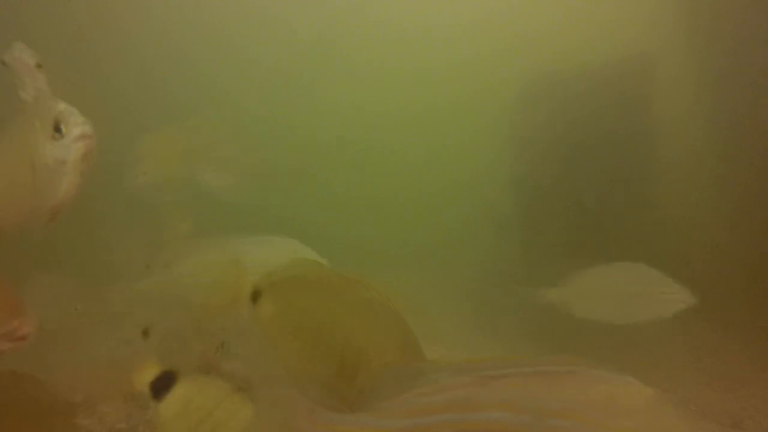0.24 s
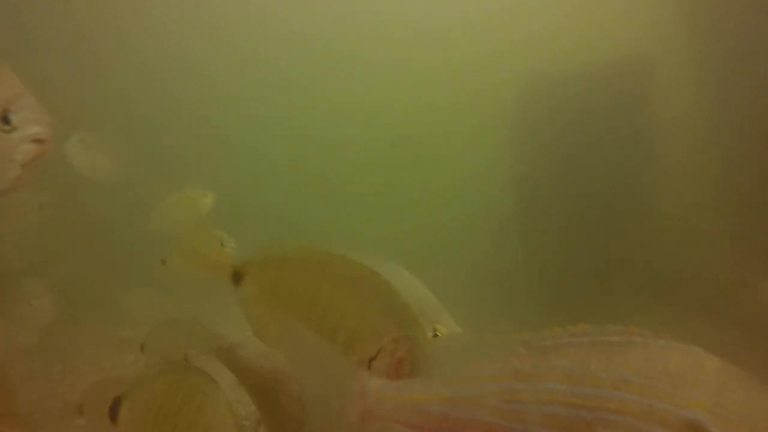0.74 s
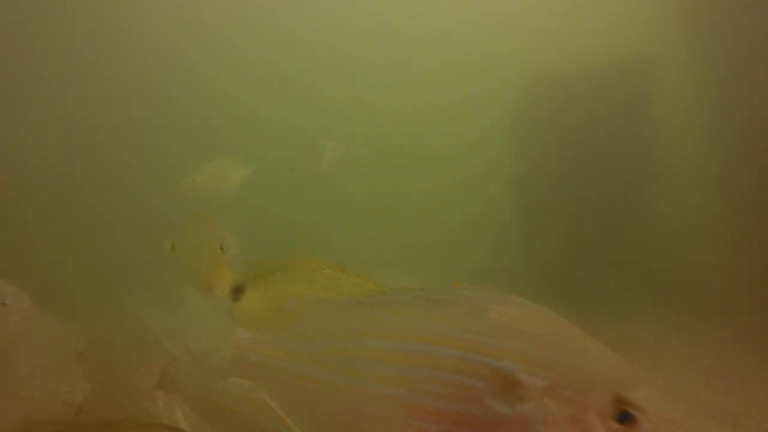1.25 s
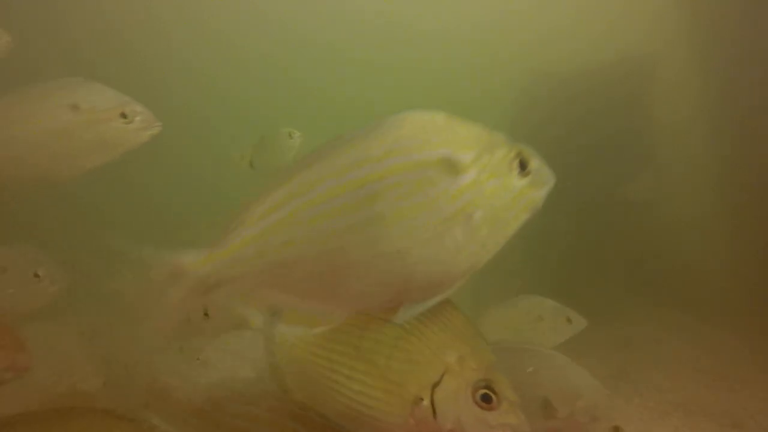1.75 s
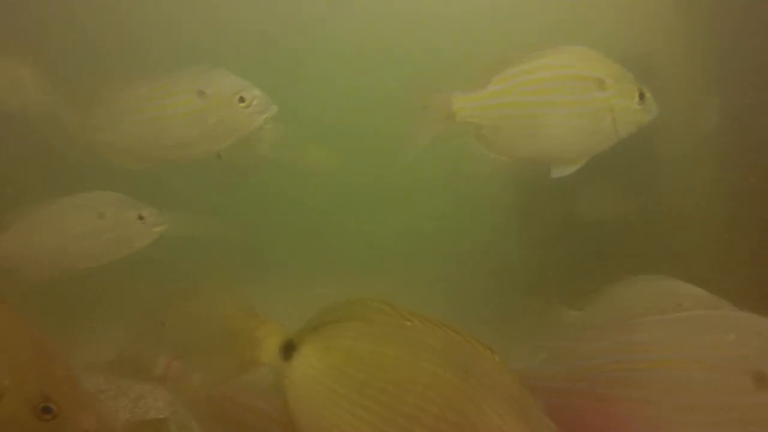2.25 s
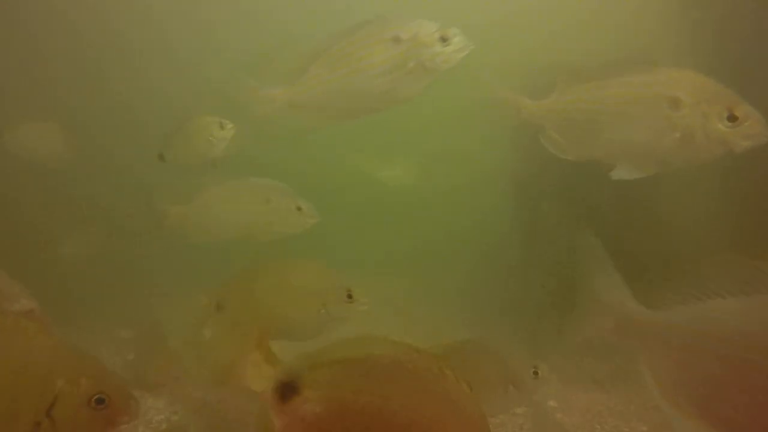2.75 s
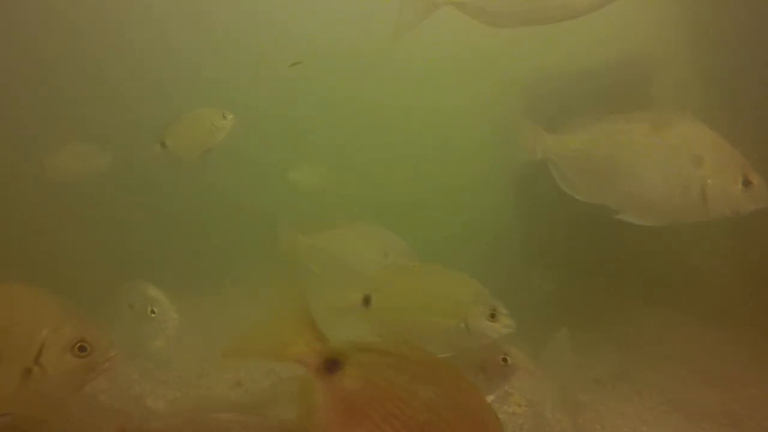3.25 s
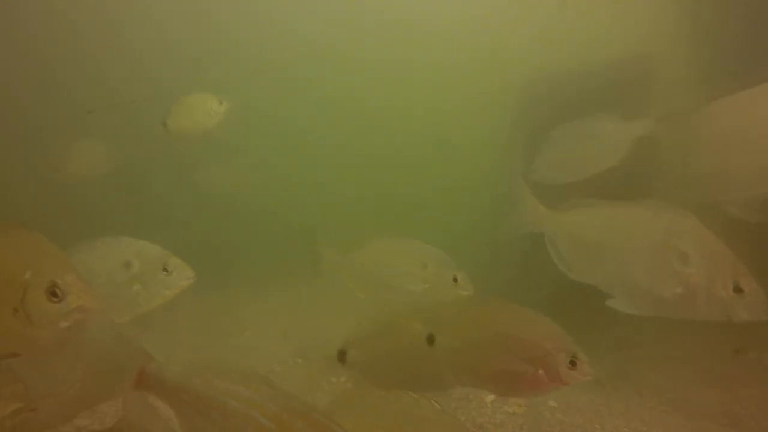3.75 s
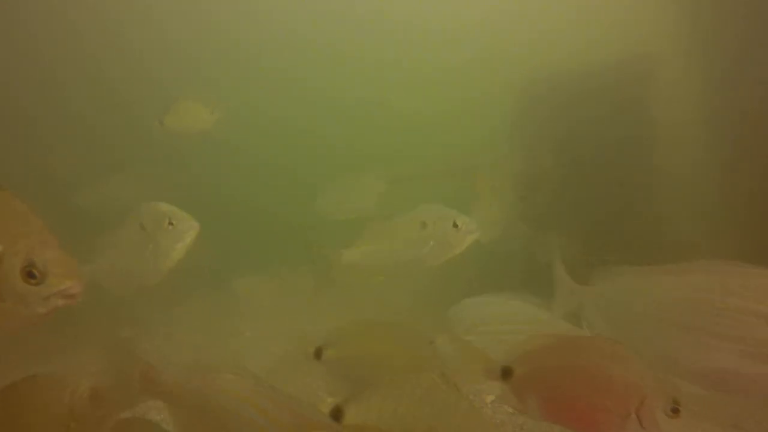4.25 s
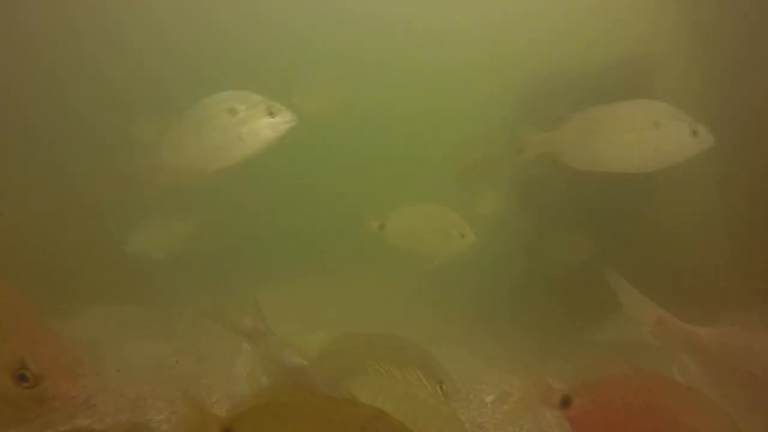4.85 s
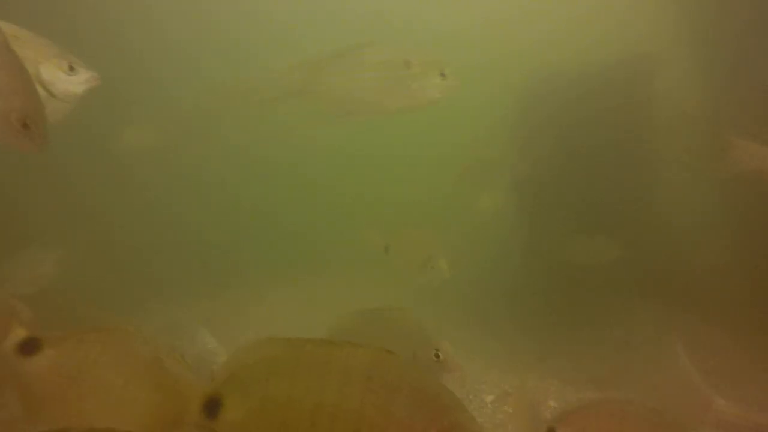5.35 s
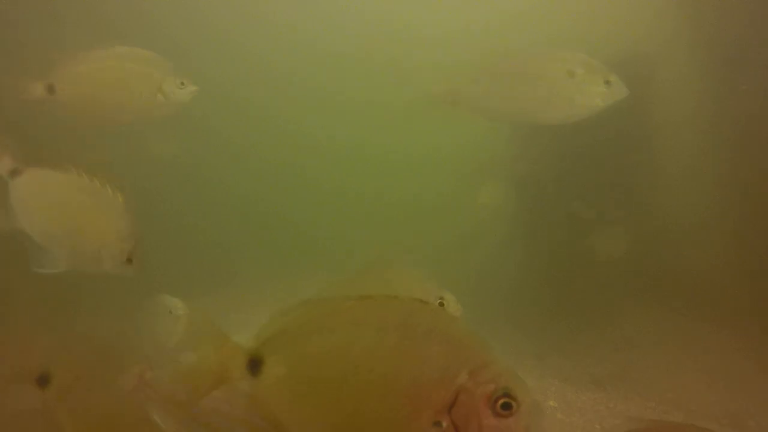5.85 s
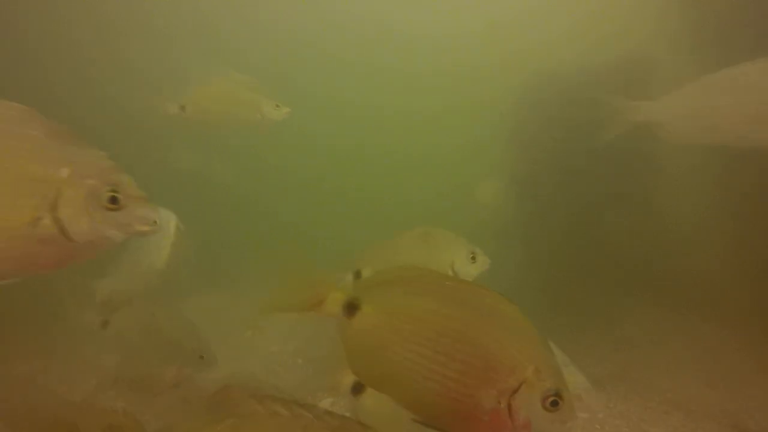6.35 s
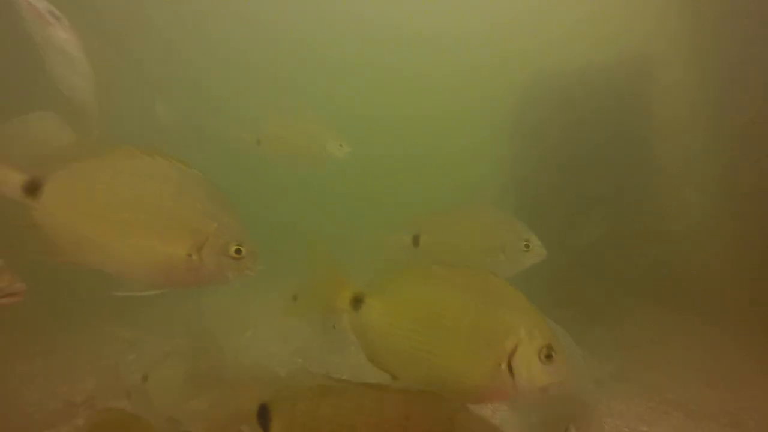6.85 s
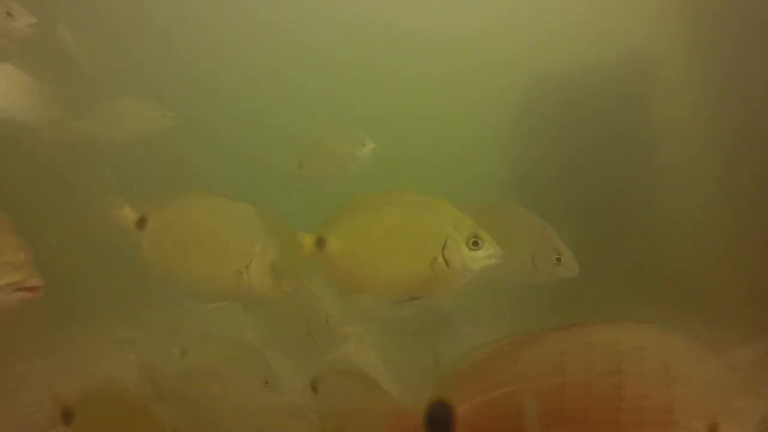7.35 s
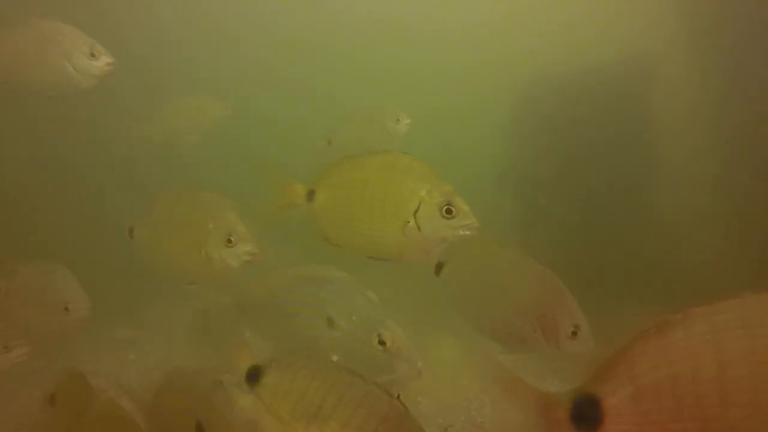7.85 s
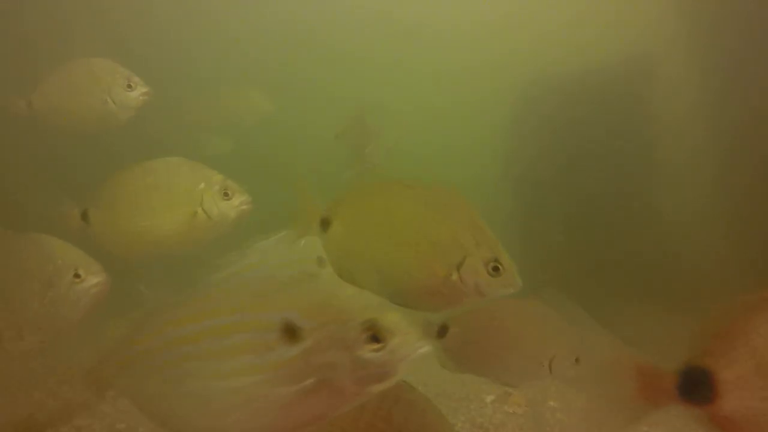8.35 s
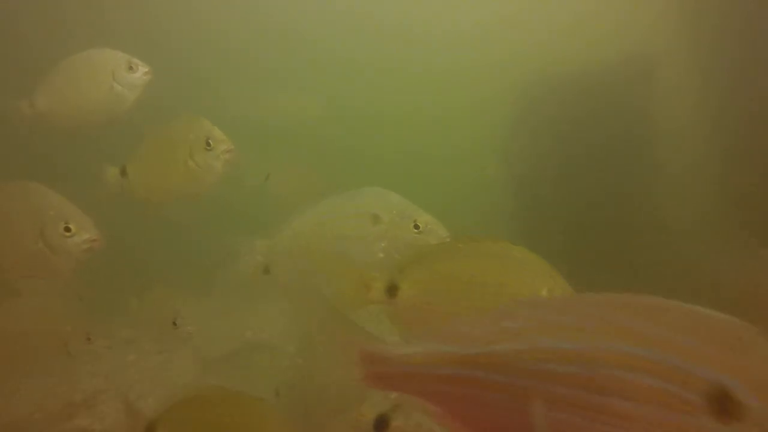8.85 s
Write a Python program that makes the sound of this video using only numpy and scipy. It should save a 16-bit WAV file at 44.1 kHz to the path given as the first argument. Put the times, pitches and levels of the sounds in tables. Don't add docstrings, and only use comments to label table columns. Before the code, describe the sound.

Underwater crackle of snapping shrimp, dense faint ticking with sharp louder clicks, over a low rumble of water, humming groans and small bubble gurgles.

```python
import sys
import numpy as np
from scipy import signal
from scipy.fft import rfft, irfft
from scipy.io import wavfile

SR = 44100
rng = np.random.default_rng(int(sys.argv[2]) if len(sys.argv) > 2 else 0)


def boost(x):
    u = np.asarray(x, float) / 20
    return 10 ** u


def to_wav(s):
    ch = np.atleast_2d(s).T
    pcm = np.round(np.clip(ch, -1, 1) * 32767)
    wavfile.write(sys.argv[1], SR, pcm.astype(np.int16))


N = 401310

# (frequency [Hz], width [Hz], level [dB])
SHELL_MODES = [(790, 560, -34.5), (1602, 71, -8), (1990, 212, -5), (2367, 225, -0.5), (2701, 123, -0.5),
               (2927, 234, -5), (3592, 230, -3.5), (4276, 570, -15), (5185, 236, -7), (5790, 2100, -16.5),
               (7610, 790, -14), (8690, 980, -21.5), (10740, 820, -21), (12650, 860, -24.5),
               (15100, 1600, -40)]
# (time [s], knock level [dB], ring over knock [dB], crack over knock [dB])
NEAR_SNAPS = [(.2604, -32.5, 2, -3), (.759, -40.5, -2, 5.5), (.9977, -29.5, -12, -17),
              (1.1928, -30.5, -3, -6.5), (2.295, -39, 1, 1), (3.3853, -22, -14.5, -7.5),
              (3.6418, -25.5, -5, 0.5), (3.8608, -20, -2, -2), (3.9214, -19.5, -24, -19.5),
              (4.411, -27, -11.5, -18), (5.1213, -39.5, 5.5, 3.5), (5.3551, -18, 0, -17),
              (5.4098, -37, -10, -3.5), (5.4978, -17, -5.5, -16.5), (5.6973, -42, 2.5, 8),
              (5.769, -27.5, -0.5, -4.5), (6.3621, -34, -9, 3.5), (6.4328, -27.5, -23, -29.5),
              (7.2845, -31, -22, -19), (7.59, -15.5, -3.5, -7), (7.668, -28.5, -12, -9.5),
              (8.033, -20.5, -28, -16.5), (8.106, -35.5, -3.5, -6.5), (8.19, -26, -12, -22),
              (8.307, -31.5, -10, -15), (8.3617, -24, -36, -25), (8.545, -28, -10.5, -14.5),
              (8.6709, -24, -31, -20), (8.9015, -20.5, -32, -20), (9.0517, -22.5, -15, -11.5)]


def rms_one(x):
    return x / np.sqrt(np.mean(x ** 2) + 1e-20)


def in_time(rows):
    s, *columns = np.transpose(rows)
    return [np.interp(np.arange(N) / SR, s, c) for c in columns]


def drift(rate_hz):
    r = np.exp(-80 * np.pi * rate_hz / SR)
    chance = rng.standard_normal(N // 40 + 2002)
    slow = signal.lfilter([1], [1, -2 * r, r * r], chance)[2000:]
    return np.interp(np.arange(N) / 40, np.arange(len(slow)), rms_one(slow))


def swells(start, hold, db, calm_db, rise_db_s, fall_db_s):
    t = np.arange(N) / SR
    level = np.full(N, float(calm_db))
    for s, h, top in zip(start, hold, db):
        before, after = np.maximum(s - t, 0), np.maximum(t - s - h, 0)
        level = np.maximum(level, top - rise_db_s * before - fall_db_s * after)
    return level


def butter(x, hz, kind, order=2):
    return signal.sosfilt(signal.butter(order, hz, kind, fs=SR, output="sos"), x)


def resonance(x, hz, width_hz):
    r = np.exp(-np.pi * width_hz / SR)
    poles = [1, -2 * r * np.cos(2 * np.pi * hz / SR), r * r]
    return signal.lfilter([(1 - r * r) / 2, 0, (r * r - 1) / 2], poles, x)


def tone(hz, db, wobble=.01, flutter_db=1.):
    phase = 2 * np.pi * np.cumsum(hz * (1 + wobble * drift(7.6))) / SR
    return np.sqrt(2) * boost(db + flutter_db * drift(9.1)) * np.sin(phase)


def pier_hum():
    # (start [s], hold [s], frequency [Hz], level [dB])
    hums = [(0, 0.27, 45.8, -50.5), (0.416, 0.39, 52.8, -47), (1.04, 0.33, 52.7, -31),
            (1.396, 0.3, 50.9, -32), (2.403, 0.29, 55, -54.5), (3.62, 0.46, 53.3, -39.5),
            (4.18, 0.042, 58, -39), (4.377, 0.26, 55, -41), (4.849, .2, 52.7, -46), (5.1, 0.13, 52.3, -43),
            (5.527, .04, 53.9, -52), (5.726, 0.027, 56.1, -46.5), (6.449, 0.27, 58.16, -46),
            (6.8, 0.23, 60.1, -39.5), (7.25, 0.071, 52.4, -45), (8.202, 0.13, 50.7, -50.5),
            (8.7, 0.094, 58, -44.5), (8.881, 0.23, 53.9, -39)]
    start, hold, hz, db = np.transpose(hums)
    pitch, = in_time(np.transpose([start + hold / 2, hz]))
    level_db = swells(start, hold, db, calm_db=-59, rise_db_s=116, fall_db_s=78)
    return tone(pitch, level_db, wobble=0.021, flutter_db=3.0)


def surge():
    # (start [s], hold [s], deep surge level [dB], slosh level [dB])
    waves = [(0, 0.14, -47, -61), (0.77, 0.34, -42, -43), (1.26, 0.39, -42.5, -43.5),
             (2.407, 0.27, -66, -55), (2.902, 0.27, -56.5, -63), (3.633, 0.034, -49, -55),
             (3.93, .6, -43.5, -43), (4.787, 0.025, -52, -46.5), (5.117, 0.022, -57.5, -42),
             (5.35, 0.26, -66, -55.5), (6.717, .35, -40, -43), (7.301, 0.76, -70, -54),
             (8.792, 0.17, -47, -44.5), (8.996, 0.087, -44, -46)]
    start, hold, deep_db, slosh_db = np.transpose(waves)
    deep_db = swells(start, hold, deep_db, calm_db=-64, rise_db_s=60, fall_db_s=70)
    slosh_db = swells(start, hold, slosh_db, calm_db=-58.5, rise_db_s=118, fall_db_s=103)
    deep, slosh = rng.standard_normal((2, N))
    deep = resonance(resonance(deep, 29.9, 5.0), 29.9, 5.0)
    slosh = butter(slosh, [62., 93.], "band", order=3)
    return boost(deep_db) * rms_one(deep) + boost(slosh_db + 2.5 * drift(12.0)) * rms_one(slosh)


def water_wash():
    # (frequency [Hz], level per Hz [dB])
    spectrum = [(12, -25), (20, -10), (69, -8), (124, -2.5), (422, -10.5), (627, -16), (743, -14.5),
                (1120, -19.5), (1410, -19), (1580, -18), (1800, -32), (2340, -50), (3960, -120)]
    curve_hz, curve_db = np.transpose(spectrum)
    hz = np.maximum(np.arange(N // 2 + 1) * SR / N, 1)
    gain = boost(np.interp(np.log(hz), np.log(curve_hz), curve_db))
    wash = irfft(rfft(rng.standard_normal(N)) * gain, N)
    return boost(-55.5) * rms_one(wash)


def gurgle():
    # (start [s], hold [s], level [dB])
    clouds = [
        (0, 1.9, -59),
        (4.005, 0.87, -55),
        (4.994, 0.17, -55.5),
        (5.7, 0.19, -60),
        (6.598, 0.28, -59.5),
        (7.598, 0.67, -55.5),
    ]
    bubbles_per_s = 500 * boost(5 * drift(7))
    born = rng.random(N) < bubbles_per_s / SR
    strength = boost(4 * np.minimum(rng.exponential(1, N), 3))
    kicks = born * strength * rng.choice([-1, 1], N)
    size = rng.integers(0, 10, N)
    bubbles = 0
    for k, hz in enumerate(np.geomspace(600, 880, 10)):
        ringing = resonance(kicks * (size == k) + 1e-18, hz, 59.0)
        bubbles = bubbles + ringing * boost(-26. * abs(np.log2(hz / 734.0)))
    level_db = swells(*np.transpose(clouds), calm_db=-63.5, rise_db_s=17, fall_db_s=39)
    return boost(level_db - 2) * rms_one(bubbles)


def whine():
    # (frequency [Hz], rms level [dB])
    lines = [(14026, -94), (14086, -94)]
    t = np.arange(N) / SR
    return sum(np.sqrt(2) * boost(db) * np.sin(2 * np.pi * hz * t) for hz, db in lines)


def housing(x):
    return sum((-1) ** k * boost(db) * resonance(x, hz, width) for k, (hz, width, db) in enumerate(SHELL_MODES))


def far_snaps(per_s=130., spread_db=4.5, tail_s=0.003):
    born = rng.random(N) < per_s * boost(3. * drift(5.)) / SR
    sizes = boost(spread_db * np.minimum(rng.exponential(1, N), 3.6))
    path = rng.integers(0, 6, N)
    decay = np.exp(-1 / (tail_s * SR))
    ticks = 0
    for k, hz in enumerate(np.geomspace(2200, 11000, 6)):
        clicks = born * sizes * (path == k)
        smear = signal.lfilter([1], [1, -decay], clicks + 1e-18)
        push = smear * rng.standard_normal(N) + 2.6 * clicks
        ticks = ticks + rms_one(resonance(push, hz, 0.54 * hz)) * (hz / 2200) ** .5
    hiss = boost(0.31 * drift(20.0)) * rng.standard_normal(N)
    return boost(-50.5 + 12) * rms_one(ticks) + boost(-46.5 + 9.0) * hiss


def groans():
    # (time [s], frequency [Hz], level [dB])
    timbers = [
        [(3.65, 176.6, -52), (3.882, 148.9, -41.5), (4.0, 120, -48), (4.12, 89.5, -54)],
        [(6.65, 93.0, -43), (6.942, 106.2, -41), (7.11, 107.1, -38.5), (7.228, 105.5, -54.5),
         (7.594, 105.7, -45.5), (7.918, 96.0, -44.5), (8.2, 84.9, -52.5)],
        [(6.62, 137.0, -58), (6.896, 156.1, -52), (7.032, 150.2, -55.5), (7.198, 167.7, -61),
         (7.906, 148.9, -57.5), (8.15, 125.3, -55)],
        [(4.6, 146.3, -68), (4.67, 150.3, -58), (5.05, 140, -67)],
        [(0.2, 273.1, -61), (.75, 275, -66.5), (.85, 276.5, -62), (1.098, 277.7, -57.5), (1.4, 276.8, -72)],
        [(6.53, 520, -60), (6.553, 560, -56), (6.575, 687, -49), (6.595, 752, -60)],
    ]
    t, out = np.arange(N) / SR, np.zeros(N)
    for rows in timbers:
        start, end = rows[0][0], rows[-1][0]
        fade = np.interp(t, [start - .04, start + 0.045, end - .02, end + 0.058], [0, 1, 1, 0])
        out += fade * tone(*in_time(rows), wobble=.01, flutter_db=2.1)
    return out


def snap_rows():
    # (time [s], knock level [dB])
    shaded = [(0.649, -37), (0.8751, -37.5), (1.122, -32), (1.26, -35.5), (1.5628, -37), (1.621, -37),
              (1.7258, -35.5), (2.546, -35.5), (2.9173, -32), (3.036, -34), (3.1397, -36), (3.2051, -37),
              (3.3298, -43), (3.679, -38.5), (4.0547, -37), (4.1401, -36.5), (4.3523, -37.5),
              (4.7617, -32.5), (5.0621, -36.5), (5.1083, -38), (5.476, -34), (5.595, -33.5), (6.081, -34),
              (6.2931, -37.5), (6.5383, -37.5), (6.708, -31), (6.8418, -33), (6.894, -37), (7.868, -38),
              (7.9982, -40)]
    # (time [s], knock level [dB])
    in_view = [(0.2414, -44), (0.4973, -44), (.7001, -43.5), (1.3293, -46.5), (1.491, -50), (1.6536, -39.5),
               (1.7471, -45), (2.0272, -44), (2.3895, -44.5), (2.7777, -49), (2.805, -40.5), (2.8925, -43),
               (3.609, -46), (3.8487, -52), (3.962, -42), (4.4633, -43.5), (5.22, -45), (5.309, -44),
               (5.684, -48), (5.7505, -45), (5.878, -53), (5.896, -45.5), (6.0592, -38.5), (6.1415, -57),
               (6.1526, -41), (6.351, -52), (7.3911, -43), (7.475, -40.5), (8.1612, -40)]
    rows = [tuple(row) for row in NEAR_SNAPS]
    rows += [(s, db, -10, -11) for s, db in shaded]
    rows += [(s, db, 2.5, -0.5) for s, db in in_view]
    s, knock, ring, crack = np.array(rows).T
    return np.transpose([s, knock, knock + ring, knock + crack, knock + crack - 5])


def near_snaps(scatter_s=0.0044, path_db=1.3):
    # (low edge [Hz], high edge [Hz], echo level [dB], trim [dB])
    snap_parts = [(593, 3080, -18, 4), (3320, 5100, -14.5, 5), (4700, 10700, -18.5, 8.5),
                  (8900, 17500, -19.5, 3.5)]
    t = np.arange(1400) / SR
    rows, shapes = snap_rows(), 0
    chance = rng.standard_normal((len(rows), 3, len(t)))
    crack = .8 * chance[:, 0] * np.exp(-t / .00015)
    crack[:, 0] = 2.58
    loudest_db = rows[:, 1:4].max(axis=1, keepdims=True)
    echoes = chance[:, 1] * np.exp(-t / scatter_s) * boost(-.33 * (loudest_db + 21))
    for k, (low, high, echo_db, trim_db) in enumerate(snap_parts):
        push = crack + boost(echo_db) * echoes
        part = 0
        for m, (hz, width, db) in enumerate(SHELL_MODES):
            if low <= hz < high:
                gain = (-1) ** m * boost(db + path_db * chance[:, 2, m:m + 1])
                part = part + gain * resonance(push, hz, 1.02 * width)
        part = butter(butter(part, 1.2 * high, "low"), 1.2 * low, "high")
        height = boost(rows[:, 1 + k] + trim_db) / np.abs(part).max(axis=1)
        shapes = shapes + part * height[:, None]
    out = np.zeros(N + 2 * len(t))
    for s, shape in zip(rows[:, 0], shapes):
        at = round((s + 0.001013) * SR)
        out[at:at + len(t)] += shape
    return out[:N]


def pops():
    # (time [s], peak level [dB], frequency [Hz], ringing length [cycles])
    knocks = [(.325, -23, 61, 2.9), (0.789, -39, 90.5, 5.7), (.79, -47.5, 213, 14.4), (.8, -43.5, 670, 5),
              (.8, -48, 433, 6.7), (.76, -44.5, 750, 8), (1.65, -57, 790, 35), (1.89, -57, 515, 22),
              (2.216, -51.5, 847, 33), (3.6, -33, 80.2, 7.8), (4.079, -30.5, 77, 8.6),
              (4.67, -53, 200, 11.5), (5.12, -35.5, 85.7, 9.2), (5.121, -42, 202, 5), (5.96, -53, 168, 16),
              (6.02, -49, 195.5, 9.8), (6.029, -54, 260, 24), (6.511, -53, 498, 34), (6.515, -52, 730, 14),
              (6.742, -57, 772, 38), (4.221, -54, 187, 11), (4.42, -51, 243, 9.2), (7.8, -46.5, 200, 12),
              (7.811, -51, 136, 6), (7.79, -45, 352, 5.3), (8.244, -56, 694, 22), (8.7, -30.5, 293.7, 2.53),
              (8.701, -35.5, 546, 3.4), (9.07, -49, 299.2, 4)]
    thuds = [(s + 0.0015, 1 + 1.74 * db + 0.32 * ring, 780, 3.2) for s, db, ring, _ in NEAR_SNAPS]
    out = np.zeros(N + SR)
    for s, peak_db, hz, cycles in [*knocks, *thuds]:
        turns = np.arange(SR // 2) / SR * hz
        shape = np.exp(-3 * turns / cycles) * (1 - np.exp(-turns / 1.01))
        at = round(s * SR)
        out[at:at + SR // 2] += boost(peak_db + 10.5) * shape * np.sin(2 * np.pi * turns)
    return out[:N]


def scene():
    low_sounds = pier_hum() + surge() + water_wash() + gurgle() + groans() + pops()
    shrimp = housing(far_snaps()) + near_snaps()
    return (low_sounds + whine() + shrimp)[None]


def roll_off(x):
    return signal.sosfilt(signal.butter(12, 16480, fs=SR, output="sos"), x)


def record(dry):
    shelved = signal.sosfilt(signal.cheby2(10, 24, 15500, fs=SR, output="sos"), dry)
    return roll_off(shelved)


dry = scene()
out = record(dry)
to_wav(out)
```